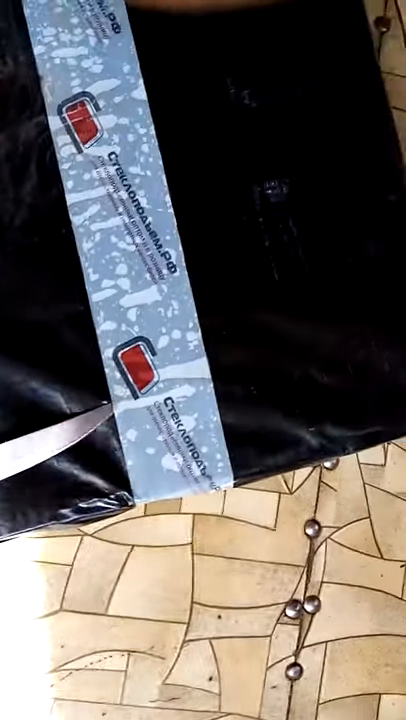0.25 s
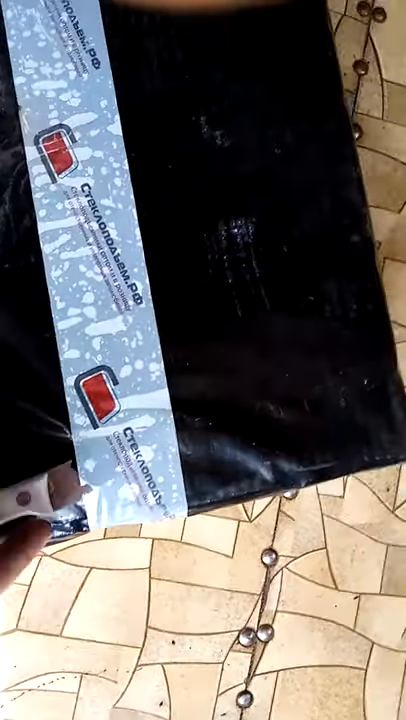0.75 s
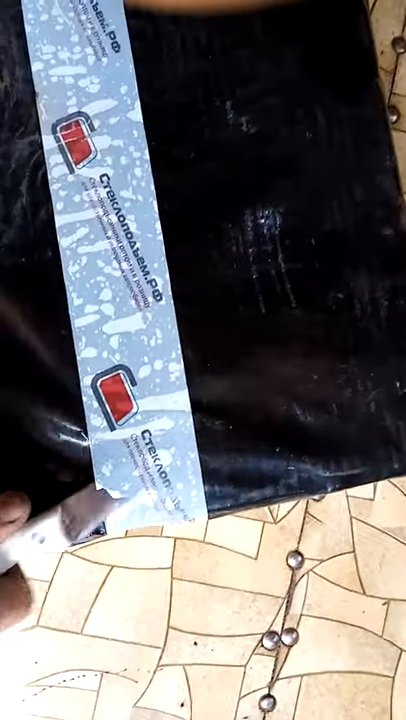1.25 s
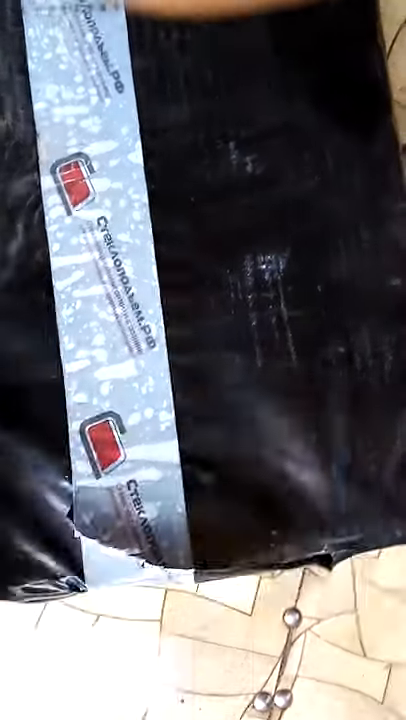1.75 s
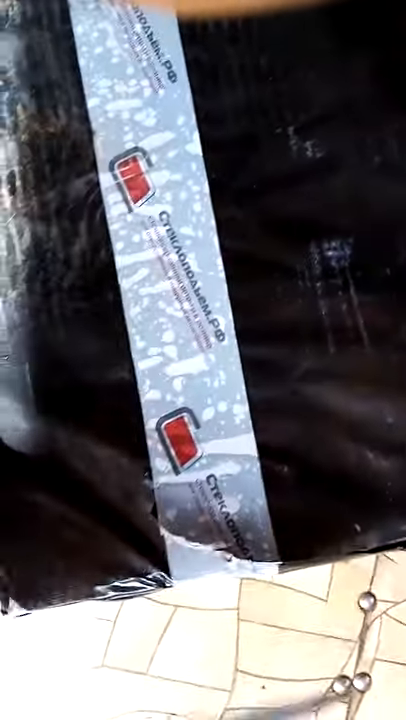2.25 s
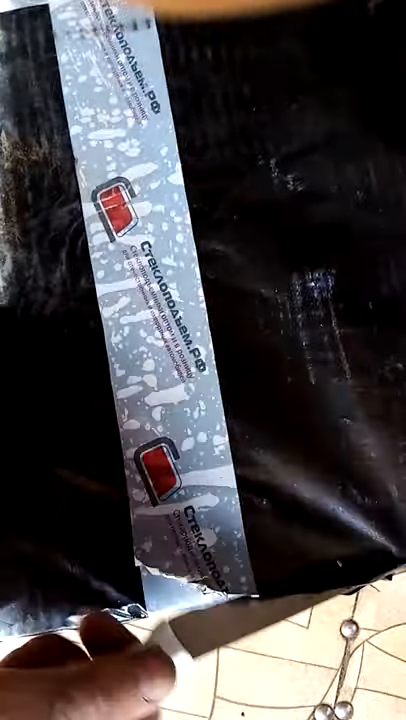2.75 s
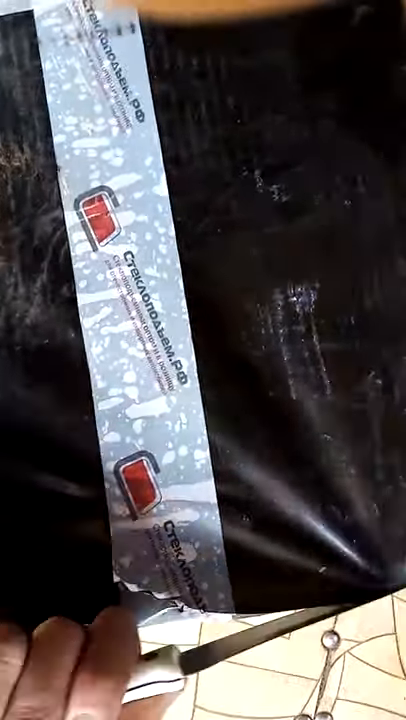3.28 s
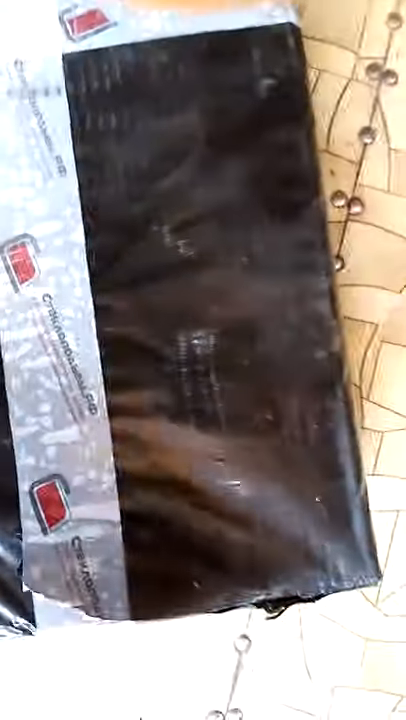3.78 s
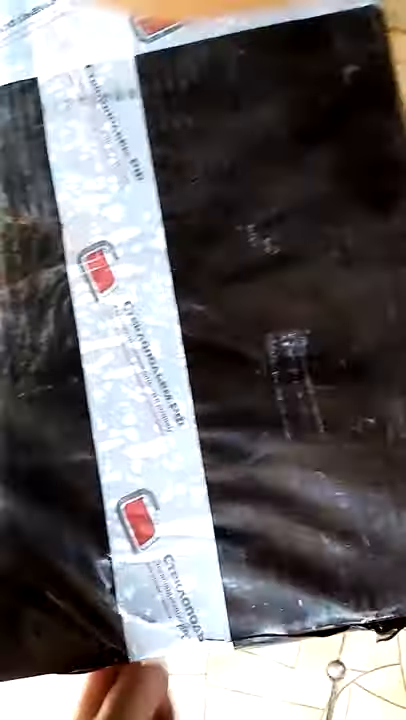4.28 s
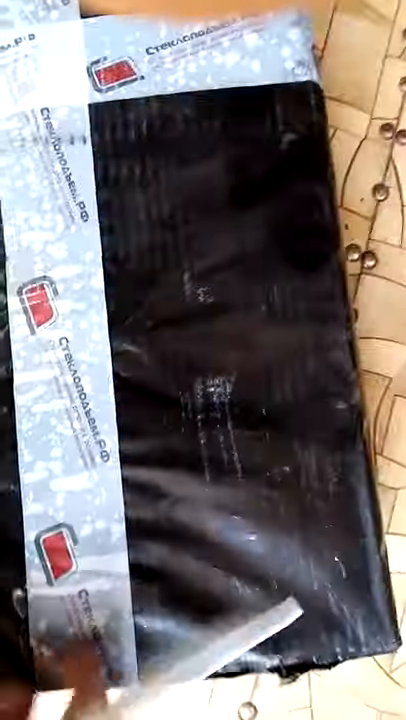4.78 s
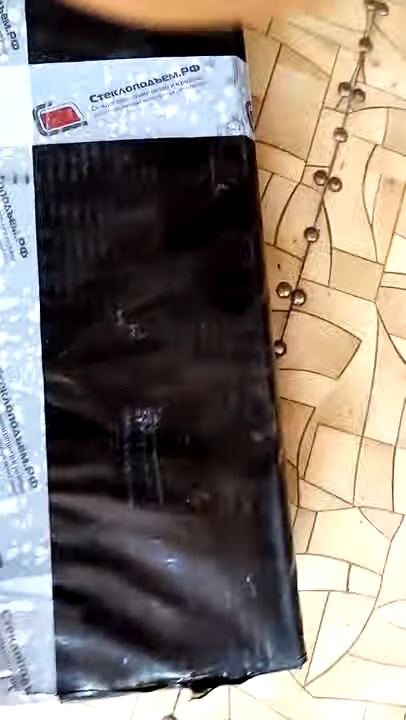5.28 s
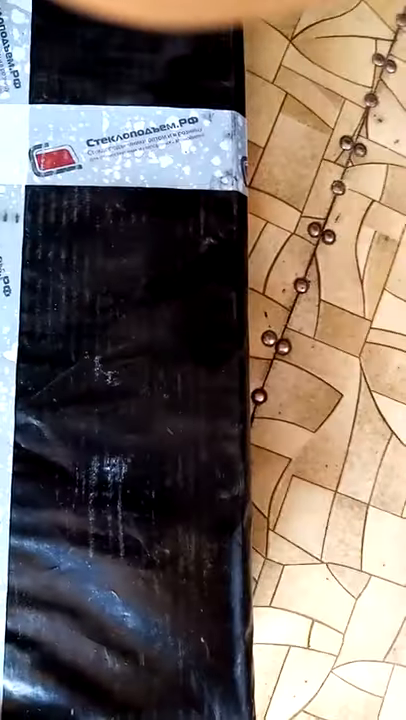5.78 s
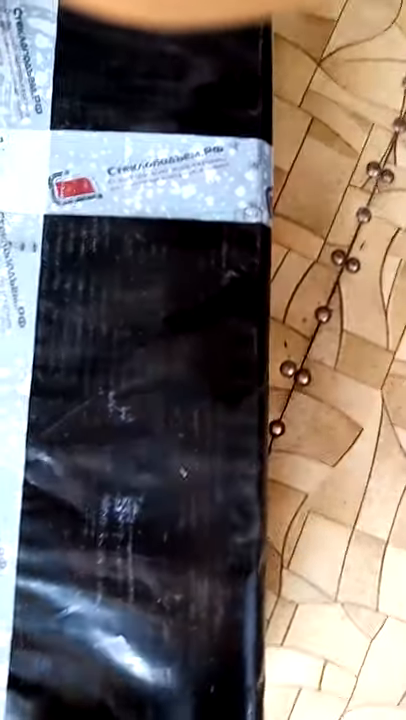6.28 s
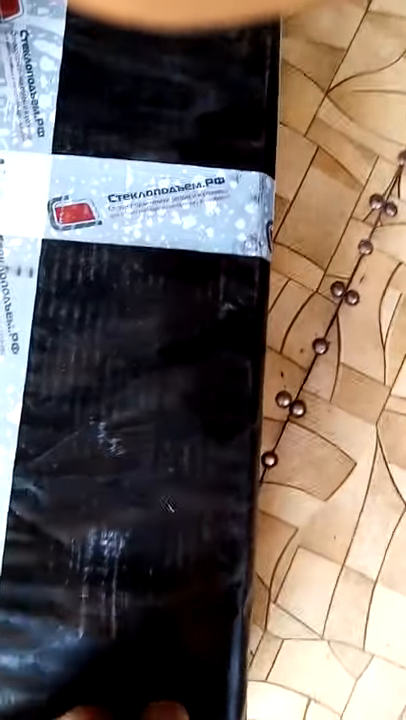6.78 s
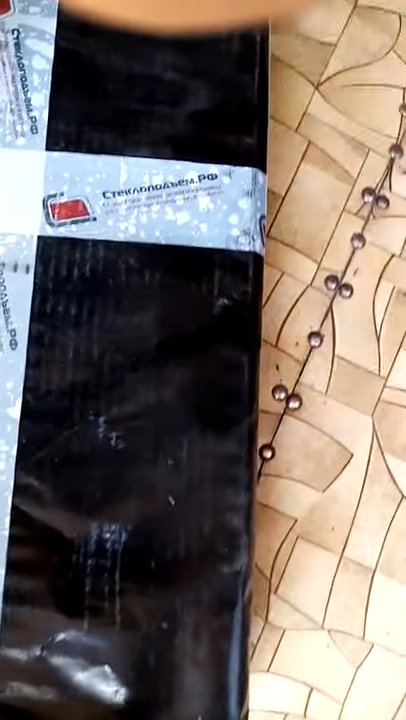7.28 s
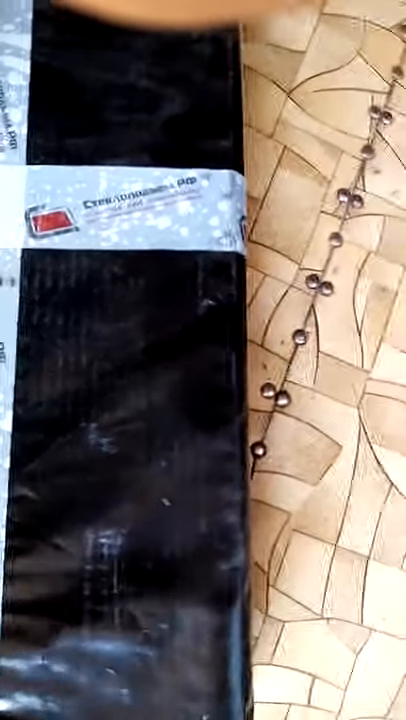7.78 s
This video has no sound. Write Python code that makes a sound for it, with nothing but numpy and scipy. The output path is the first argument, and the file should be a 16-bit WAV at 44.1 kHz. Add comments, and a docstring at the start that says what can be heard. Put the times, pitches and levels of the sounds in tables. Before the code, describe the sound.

Heard very close in a small room, left side much stronger, the right weaker and more diffuse, over faint hiss. From 0 to 1.7 s a blade works through plastic film and tape: a bright rasp at 0.25-0.55 s with a falling squeaky edge, then short scratchy strokes with clusters of sharp snaps and hollow cardboard knocks. It fades to near quiet around 1.9-2.3 s. Strong rubbing strokes return at 2.4-2.9 s, then a hard snap and knock at 3.26 s. Faint crinkles follow; at 3.85-4.15 s the parcel is handled with rustles, small snaps and a low thump. From 4.2 to 6.3 s it is sparse: soft rustles, bumps at 4.65, 5.88 and 6.15 s, with near-silent gaps. From 6.5 s loud film pulls come in a run, with a low thump at 6.6 s, a knock at 6.77 s, a brief squeak near 7.2 s, and rapid snaps up to 8 s.

```python
"""First a knife slits the plastic film and packing tape around a cardboard parcel; then hands turn it and pull the film.
After a busy opening and a lull come more strokes, a quieter, patchy stretch, and a loud run of pulls to finish.
Blade and film rub in dense tiny slips, stretched tape lets go in sharp snaps, and the box answers with hollow knocks.
All is close to a hand-held recorder in a small room; its right microphone is much weaker, most in the upper middle."""
import sys
import numpy as np
from scipy import signal
from scipy.fft import rfft, irfft, next_fast_len
from scipy.io import wavfile
from scipy.ndimage import uniform_filter1d, map_coordinates

SR = 44100
rng = np.random.default_rng(int(sys.argv[2]) if len(sys.argv) > 2 else 0)


def int16_out(signal):
    """Quantize to a 16-bit WAV file."""
    q = np.round(np.clip(np.atleast_2d(signal).T, -1, 1) * 32767)
    wavfile.write(sys.argv[1], SR, q.astype(np.int16))


N = 354563
TIME = np.arange(N) / SR


def amp(db):
    """Decibels to gain."""
    return 10 ** (np.asarray(db) / 20)


def unit(x):
    """Scales to rms 1."""
    return x / np.sqrt(np.mean(x ** 2) + 1e-20)


def read(points, hz):
    """Joins (f/Hz, value) points on a log-frequency axis."""
    f, value = np.transpose(points)
    return np.interp(np.log(hz + 1), np.log(f + 1), value)


def add(mix, start_s, sound):
    """Mixes a sound in at its start time."""
    part = mix[max(round(start_s * SR), 0):][:len(sound)]
    part += sound[:len(part)]


def coloured(x, points):
    """Filters x by a (f/Hz, gain/dB) curve."""
    size = next_fast_len(N + 4096)
    gain = amp(read(points, np.fft.rfftfreq(size, 1 / SR)))
    return irfft(rfft(x, size) * gain, size)[..., :N]


def causal(db):
    """Minimum-phase impulse response with the given gains: it starts sharply, then dies."""
    cepstrum = irfft(np.log(amp(db)))
    half = len(cepstrum) // 2
    # fold the backward half of the cepstrum onto the forward half
    cepstrum[1:half] *= 2
    cepstrum[half + 1:] = 0
    return irfft(np.exp(rfft(cepstrum)))


def wander(per_s):
    """Random curve of rms 1 that heads for a new point per_s times a second."""
    return unit(np.interp(TIME * per_s, np.arange(N), rng.standard_normal(N)))


def ripple(shape, order, size):
    """Random pattern of rms 1, smoothed over order bins and size frames."""
    noise = rng.standard_normal(shape)
    across_pitch = uniform_filter1d(noise, order, axis=0)
    return unit(uniform_filter1d(across_pitch, size, axis=1))


# colour of the still room and microphone hiss: (f/Hz, relative level per Hz/dB)
HISS_COLOUR = [(24, -53), (40, -17), (118, 3.5), (1070, -9), (1410, -5.5), (3060, -11), (4460, -12),
               (4800, -22), (6020, -23), (6820, 2.5), (7360, -6), (8550, -31), (13800, -31), (14800, -25),
               (16000, -38)]


def hiss(left_db=-66, right_db=-74):
    """Steady, independent noise in each microphone, stronger on the left."""
    noise = coloured(rng.standard_normal((2, N)), HISS_COLOUR)
    return unit(noise) * amp([[left_db], [right_db]])


def echoes(x, t60, start_s):
    """Sparse reflections of random sign, each band dying at its own speed."""
    strength = rng.standard_normal(SR)
    hits = rng.random(SR) < 4000 / SR  # about 4000 reflections per second
    taps = strength * hits * (np.arange(SR) > start_s * SR)
    hz, t, bands = signal.stft(taps, SR, nperseg=128)
    decay = amp(-60 * t / read(t60, hz)[:, None])
    tail = signal.istft(bands * decay, SR, nperseg=128)[1]
    return signal.fftconvolve(x, tail / np.linalg.norm(tail))[:N]


# how long the small room rings: (f/Hz, t60/s)
ROOM_RING = [(100, 0.33), (400, 0.44), (1500, 0.24), (5000, 0.073), (12000, 0.31)]


def room(parcel, start_s):
    """The room returns the parcel as a ring whose length depends on pitch."""
    return echoes(parcel, ROOM_RING, start_s)


# cut that weakens all the right microphone hears of the parcel, most around 2.5 kHz: (f/Hz, cut/dB)
RIGHT_SHADE = [(60, 10.5), (250, 9), (700, 13), (1500, 19), (2500, 21.5), (4000, 15.5), (6500, 15.5),
               (8500, 8.5), (12000, 7.5), (15500, 3.5)]


def right_microphone(parcel, room_db=-11, scatter_db=0, direct_db=-6):
    """Farther off and shaded, it hears the parcel later, and much of it by reflection."""
    lag_s = np.interp(TIME, [0, 8], [.00097, .00073])
    late = map_coordinates(parcel, [(TIME - lag_s) * SR], order=3)
    direct = coloured(late, [(400, 0.011), (2000, direct_db), (7000, direct_db - 8.5)])
    # the paths of the reflections change as the hands and the parcel move
    turn = np.pi * wander(per_s=4)
    near = [(200, 0.023), (6000, 0.021)]  # (f/Hz, t60/s)
    first = echoes(late, near, start_s=.0003)
    second = echoes(late, near, start_s=.0003)
    moving = np.cos(turn) * first + np.sin(turn) * second
    scattered = coloured(moving, [(150, -10.0), (700, -3), (2000, -0.5)])
    heard = direct + amp(scatter_db) * scattered + amp(room_db) * room(parcel, start_s=0.009)
    return coloured(heard, [(hz, -cut_db) for hz, cut_db in RIGHT_SHADE])


# the whole parcel shifting on the table: (t/s, level before output gain/dB, swell time/s)
PARCEL_SHIFTS = [(3.914, -34, 0.0096), (6.603, -36, 0.025)]


def thumps(low_hz=73, upper_hz=122, upper_db=-7):
    """The heavy parcel rocks on the table: two low tones swell briefly and die."""
    out, t = np.zeros(N), np.arange(SR // 2) / SR
    low = np.sin(2 * np.pi * low_hz * t)
    upper = amp(upper_db) * np.sin(2 * np.pi * upper_hz * t)
    for start, level, swell_s in PARCEL_SHIFTS:
        swell = t / swell_s * np.exp(1 - t / swell_s)  # peaks at 1
        add(out, start, amp(level) * np.sqrt(2) * (low + upper) * swell)
    return out


# blade or fingers bumping the box: (t/s, level over 30 ms before output gain/dB, hardness/dB)
BOX_BUMPS = [(0.1495, -31, -16), (0.2281, -40.5, -2), (0.5741, -42, 8), (0.8929, -40.5, 11),
             (1.4845, -39.5, 16), (1.5853, -38, 16), (1.6772, -55, 6), (2.3795, -32.5, -3.5),
             (3.2566, -33.5, -16), (3.2907, -41.5, 2), (3.9042, -39, 11.5), (4.6459, -40, -9),
             (4.7642, -46, -1), (4.9239, -39, 8), (5.5398, -45.5, -9.5), (5.5876, -49, 4),
             (5.8824, -34.5, -4), (6.1497, -35, 3), (6.35, -36.5, -19), (6.7697, -32.5, 11),
             (7.2947, -41.5, -1), (7.6088, -39, 10)]
# modes of the cardboard box: (f/Hz, relative level/dB, t60/s)
BOX_MODES = [(121, -15.5, 0.17), (159.5, -12.5, 0.091), (246.3, 0.5, 0.1), (260, -7.5, .07),
             (353, -9.5, 0.038), (600, -3.5, 0.17), (707, -8, 0.036), (850, -2, 0.075), (1079, -4.5, 0.032),
             (1250, -7, 0.036), (1420, -18.5, 0.0053), (1510, 0, 0.026)]


def knocks(place_db=3, detune=0.069, thud_db=-3, thud_t60=0.11):
    """Every bump rings the box modes over a dull thud; a hard bump rings the upper ones more."""
    out, t = np.zeros(N), np.arange(SR // 3) / SR
    hz, mode_db, t60 = np.transpose(BOX_MODES)[:, :, None]
    draws = rng.standard_normal((len(BOX_BUMPS), 3, len(BOX_MODES), 1))
    cardboard = signal.butter(2, [130, 900], "band", fs=SR, output="sos")
    thuds = signal.sosfilt(cardboard, rng.standard_normal((len(BOX_BUMPS), len(t))))
    for (start, level, hard_db), (place, shift, side), thud in zip(BOX_BUMPS, draws, thuds):
        # each bump favours other modes, flips some, and detunes the upper ones most
        hardness = hard_db * read([(300, 0.023), (600, 0.33)], hz)
        size = np.sign(side) * amp(mode_db + place_db * place + hardness)
        pitch = hz * (1 + detune * shift * hz / hz.max())
        modes = size * amp(-60 * t / t60) * np.sin(2 * np.pi * pitch * t)
        ring = modes.sum(0) + amp(thud_db) * unit(thud) * amp(-60 * t / thud_t60)
        add(out, start, amp(level) * ring / np.std(ring[:round(.03 * SR)]))
    return out


# film and box sounding one resonance as they catch on the blade or on each other:
# (t/s, length/s, start f/Hz, end f/Hz, width/Hz, level before fades and output gain/dB)
CATCHES = [(0.312, 0.26, 4646, 2103, 1060, -31.5), (1.157, 0.15, 2075, 2560, 261, -30.5),
           (1.863, 0.087, 2160, 2980, 500, -56), (2.28, 0.033, 1480, 1073, 700, -59.5),
           (2.411, 0.18, 591, 547, 131, -38.5), (2.436, 0.23, 2830, 3470, 500, -36),
           (2.767, 0.14, 3270, 3005, 497, -30.5), (3.278, 0.091, 585, 422, 110, -39.5),
           (3.299, 0.098, 3110, 2840, 300, -43), (3.529, 0.064, 2600, 2990, 244, -56.5),
           (3.614, 0.024, 1685, 1790, 504, -49), (4.325, 0.024, 168, 139, 50, -53.5),
           (4.565, .075, 4130, 4100, 50, -64), (5.236, .11, 4100, 4080, 100, -68),
           (5.378, 0.062, 4130, 4170, 90, -74), (5.47, 0.017, 6300, 5910, 1400, -42.5),
           (6.799, 0.12, 1920, 2200, 500, -33.5), (7.178, 0.03, 4070, 4330, 280, -27),
           (7.804, 0.041, 1740, 1865, 380, -28.5)]


def squeaks():
    """For a moment the slips feed one resonance, gliding as the film is stretched or let go."""
    out = np.zeros(N)
    noises = rng.standard_normal((len(CATCHES), 2, SR // 2))
    for (start, length, start_hz, end_hz, width, level), noise in zip(CATCHES, noises):
        count, pole = round(length * SR), np.exp(-np.pi * width / SR)
        # slow complex noise gives the tone its width; the carrier gives it its pitch
        sway = signal.lfilter([1], np.poly([pole, pole]), noise[0] + 1j * noise[1])[-count:]
        phase = 2 * np.pi * np.cumsum(np.linspace(start_hz, end_hz, count)) / SR
        ring = (sway * np.exp(1j * phase)).real
        add(out, start, amp(level) * unit(ring) * signal.windows.tukey(count, .7))
    return out


# broad colour of the film: (f/Hz, relative level per Hz/dB)
FILM_COLOUR = [(29, -36.5), (50, -20.5), (70, -17), (208, -4.5), (240, -2), (408, -6), (586, -1.5),
               (973, -10.5), (2270, -2), (4900, 1.5), (6550, 1.5), (9180, -23.5), (12900, -35.5),
               (14900, -36.5), (16000, -34)]
# finer peaks and dips, those near 7 and 15 kHz from the microphones: (f/Hz, width/Hz, height/dB)
FINE_DETAIL = [(119, 25, 6), (244, 17, 3.5), (414, 38, -3.5), (546, 58, -2.5), (2300, 300, 0.5),
               (4940, 520, -2), (7085, 710, 5), (8560, 700, -1), (15150, 550, 7.5)]


def film_db(hz):
    """Fixed colour of the film lying on its box, as the microphones hear it, with unit mean power over the
    given pitches."""
    colour = read(FILM_COLOUR, hz)
    for f, width, db in FINE_DETAIL:
        colour = colour + db * np.exp(-((hz - f) / width) ** 2)
    return colour - 10 * np.log10(np.mean(amp(colour) ** 2))


def posture_db(hz, boom_db, body_db, bright_db):
    """Change of colour: pressing on the box adds boom, slack film adds body, taut film is bright."""
    boom = read([(380, 0.72), (650, 0)], hz)
    body = read([(380, 0), (650, 0.77), (1600, 0.97), (2500, 0.013)], hz)
    bright = read([(1600, -0.19), (2500, -0.87), (3400, -0.3), (5800, 0.5)], hz)
    return boom_db * boom + body_db * body + bright_db * bright


# runs of snaps, some loud and some faint, where the film gives way bit by bit:
# (t/s, length/s, centre level before colour and output gain/dB, centre brightness/dB)
GIVING_WAY = [(0.574, 0.049, -26.5, -2.5), (1.174, .09, -43, -10), (1.404, .035, -23, -3),
              (3.423, .05, -51.5, 10), (3.633, .11, -52, 12.5), (4.153, .035, -36.5, 3),
              (5.808, 0.11, -43.5, 17), (7.962, 0.025, -25, -12)]


def crackle_snaps(per_s=54, body_db=-7, spread_db=3.5, colour_spread_db=4):
    """Unevenly spaced snaps of each run, as rows (t/s, level/dB, body/dB, brightness/dB)."""
    rows = []
    for start, length, level, bright in GIVING_WAY:
        count = max(round(length * per_s), 1)
        draws = rng.uniform(-1, 1, (20, 3))[:count]
        for k, (late, size, tone) in enumerate(draws):
            when = start + length * (k + .5 + .5 * late) / count
            rows.append((when, level + spread_db * size, body_db, bright + colour_spread_db * tone))
    return rows


# tape and film letting go: (t/s, level over 4 ms before colour and output gain/dB, body/dB, brightness/dB)
RELEASES = [(0.1516, -19.5, 1, -4), (0.34, -29.5, -26, 5), (0.5436, -34, -21, -4), (0.548, -27, -9, -14),
            (0.5586, -17.5, -19, -10.5), (0.6299, -25, -3, -6), (0.6437, -21, -16, -5),
            (0.6634, -22, -6, -7), (0.7585, -21.5, -7, -7.5), (1.1544, -20, -16, 4), (1.1697, -20, 7, -11),
            (1.2099, -33.5, 15, -31), (1.2614, -30.5, -3, 5), (1.2798, -22, -6, -13),
            (1.399, -22.5, -5.5, -16.5), (1.4369, -23.5, -6, -17), (1.459, -23.5, -25, -12),
            (1.4852, -17, 0, -8), (1.4878, -23, 11, -9), (1.4934, -23, -11, -12), (1.5222, -20.5, 1, -10),
            (1.5953, -24, 0, 5), (1.6792, -16.5, 7, -6), (1.924, -44.5, -12, 3),
            (1.9894, -51.5, -28.5, 35.5), (2.3784, -26.5, 5.5, -12), (2.7864, -19, 1, -3),
            (3.2576, -12.5, -51, -2.5), (3.266, -21.5, -11, -4), (3.2904, -15, -15, 2),
            (3.2932, -16, -4.5, 5), (3.63, -40, -8, -2.5), (3.8563, -33, -9, -4.5), (3.8699, -29.5, -5, 2),
            (3.8867, -34, 7, 10), (3.8956, -30, 6, 12), (3.9042, -22.5, 12, -1.5), (3.9233, -29.5, 11, 3),
            (3.964, -29.5, -27, 1), (4.0132, -30.5, -8, 5), (4.021, -39, -11, 25), (4.128, -23.5, 6, -3.5),
            (4.1325, -30, 6, -3), (4.3159, -42, -18, 9.5), (4.4851, -49, -21, 16.5),
            (4.6463, -23.5, 13, 5.5), (4.7658, -39, 14, -15), (5.1062, -54.5, -18.5, 28.5),
            (5.477, -58.5, -19, 19.5), (5.5413, -30.5, -4.5, -3), (5.591, -35.5, 13.5, -4),
            (5.709, -45.5, -22, 39), (5.863, -32, -2.5, 15.5), (6.1487, -34, 20.5, -10),
            (6.3469, -28.5, 0, 2), (6.377, -23.5, 1.5, 11), (6.5574, -19, -5, -2.5),
            (6.7384, -22.5, -41, -12), (7.198, -27, -3, 5), (7.5379, -29.5, 14, -10.5),
            (7.5845, -19.5, -9, -5), (7.6198, -21, 3.5, -4), (7.7626, -30.5, -4, -12), (7.855, -19, -33, 2),
            (7.973, -19.5, -12, -2), (7.9931, -22, -9, 2), (8.0158, -17.5, 1.5, -9)]


def snaps(flutter_db=-6, flutter_s=.0009, thin_db=-6, top_db=3):
    """Each snap is one sharp release and about a millisecond of flutter in the film."""
    out, t = np.zeros(N), np.arange(2048) / SR
    hz, span = np.fft.rfftfreq(len(t), 1 / SR), .004 * SR
    colour = film_db(hz) + top_db * read([(7500, 0), (10000, 0.93)], hz)
    rows = RELEASES + crackle_snaps()
    noises = rng.standard_normal((len(rows), len(t)))
    for (start, level, body, bright), noise in zip(rows, noises):
        release = amp(flutter_db) * noise * np.exp(-t / flutter_s)
        release[0] += 1
        boom = min(body, 0) + thin_db
        film = causal(colour + posture_db(hz, boom, body, bright))
        snap = signal.fftconvolve(release, film)
        # the film's colour, not the chance flutter, sets the energy
        energy = np.sqrt(span) * np.linalg.norm(film) / np.linalg.norm(snap)
        add(out, start, snap * amp(level) * energy)
    return out


# pushes of the blade and pulls of the hand: (t/s, length/s, level before colour and output gain/dB,
# boom of the box/dB, body of the loose film/dB, brightness/dB, top-octave fizz/dB)
PUSHES_AND_PULLS = [(0, 0.025, -51.5, 30, 7.5, 9, 2), (0.077, 0.059, -38.5, 4, 2, 1.5, 1.5),
                    (0.233, .31, -28, -6, -3.5, 4, 3), (0.553, 0.096, -34.5, 3.5, 6.5, -2.5, -3),
                    (0.663, 0.083, -32.5, 19, 12.5, 0, -7), (0.768, 0.031, -36.5, 21.5, 9.5, -5.5, 0),
                    (0.834, 0.042, -38.5, 14, -4, -4.5, 2), (0.928, 0.035, -38, 10, 13.5, 1, 2.5),
                    (1.009, 0.013, -43, 22, 23, -11, -4), (1.041, 0.059, -30, -3.5, 6, -6, 4),
                    (1.117, 0.099, -28, 2, 8, -8, 6.5), (1.202, 0.17, -33, 3, -0.5, -4.5, 1),
                    (1.392, 0.034, -35.5, 4.5, -3, -5.5, 2), (1.415, .13, -32.5, 12, 2.5, -5.5, 6),
                    (1.573, 0.063, -29, 0.5, -3.5, -3, 11), (1.633, 0.14, -44.5, 10, 4, 1, -7),
                    (1.845, .088, -50.5, -3.5, -0.5, -.5, -5), (1.983, 0.06, -59, 6, -10.5, 8.5, 2),
                    (2.094, 0.17, -69, 2, 3.5, 9.5, 0), (2.374, .12, -29, 3, 3, -4, 2.5),
                    (2.463, 0.13, -25, -1.5, 1, -0.5, 2), (2.664, 0.12, -34.5, 0, 3.5, -3.5, 12),
                    (2.734, 0.18, -28, -3, 0.5, -2, -0.5), (2.881, 0.12, -40, -4, -1.5, -3, 4),
                    (3.074, .04, -49.5, 27.5, -2, -6.5, -6), (3.126, 0.096, -48, 21, 2, -2, 1),
                    (3.244, 0.12, -34, 9.5, 2.5, 2.5, -2), (3.416, 0.062, -52.5, 16, -1, 1.5, -1),
                    (3.532, 0.21, -53, 1, -5, 0, 1), (3.838, 0.099, -40.5, 5.5, -2, -2.5, 6.5),
                    (3.959, 0.16, -41, 8.5, 3.5, 3.5, 7.5), (4.095, 0.089, -41, 8, 5.5, 0.5, 16.5),
                    (4.299, 0.019, -55.5, 2.5, 1.5, -3, 3), (4.436, 0.19, -65.5, -2.5, -5.5, 12, 3),
                    (4.692, 0.067, -40.5, 12.5, 2, 8, -4), (4.775, 0.021, -49, 14, 5, 1, -7),
                    (4.81, 0.11, -53, 6, -2.5, 7, 0), (4.883, 0.041, -36.5, -5, 11, 4.5, 4.5),
                    (4.978, 0.032, -38.5, 11, -1, 6, 0.5), (5.068, 0.32, -74, -4, 1.5, 12, -1),
                    (5.513, 0.098, -57, 2.5, 11.5, 1.5, -9), (5.7, 0.084, -65, -1.5, -3.5, 19.5, -4),
                    (5.762, 0.16, -38, 14.5, 8, -2, -0.5), (5.957, 0.073, -48.5, 29.5, 12.5, -5, -6),
                    (6.066, 0.093, -37, -2.5, 6, 7, 4), (6.253, 0.14, -38.5, 10, 5, -0.5, 0),
                    (6.507, 0.21, -23, -1, 0, 0, -1), (6.706, .18, -28.5, 1, 10.5, -4, -4.5),
                    (6.925, .15, -43, 7, 4.5, -8, 3), (7.076, 0.12, -23, -5.5, 1, -7, -1),
                    (7.2, 0.098, -36.5, 3, 1.5, -5, -7), (7.314, .17, -32.5, 1.5, 8, -3.5, -3.5),
                    (7.543, 0.054, -27.5, -1, 7, -5, -11), (7.634, 0.058, -30, -1.5, 2, -2.5, -6),
                    (7.695, .07, -43, 11, 16, -6, 0), (7.798, 0.026, -26.5, 2.5, 5, 3.5, -6),
                    (7.87, 0.032, -34.5, 8.5, 1, -1, -5), (7.918, 0.043, -28, 3.5, -1, 0, 0),
                    (7.994, 0.063, -43, 11, 22, -1, 5)]
# how fast the sound dies once the stroke stops: (f/Hz, decay in dB/s)
STROKE_DECAY = [(200, 231), (1000, 272), (2800, 278.5), (6000, 322)]


def stroke_gain(hz, t, attack_s=0.11, attack_share=0.52):
    """Gain over pitch and time: every stroke swells, holds and dies away, its treble fastest."""
    power, hz = np.zeros((len(hz), len(t))), hz[:, None]
    for start, length, level, boom, body, bright, fizz in PUSHES_AND_PULLS:
        now = (t > start) & (t < start + length + .5)
        age = t[now] - start
        # a short stroke gathers speed over a share of its length
        rise_s = min(attack_s, attack_share * length)
        swell = np.sin(np.pi / 2 * np.minimum(age / rise_s, 1)) ** 2
        fade_db = read(STROKE_DECAY, hz) * np.maximum(age - length, 0)
        # taut film and peeling tape fizz in the top octave
        fizz_db = fizz * read([(7500, 0.1), (11000, 1)], hz)
        colour_db = posture_db(hz, boom, body, bright) + fizz_db
        power[:, now] += (swell * amp(level + colour_db - fade_db)) ** 2
    return np.sqrt(power)


def slips(per_s, spread_db):
    """A random train of tiny slips of either sign, their sizes scattered exponentially in dB."""
    size = amp(spread_db * np.minimum(rng.exponential(1, N), 4))
    sign = rng.choice([-1., 1.], N)
    return unit(sign * size * (rng.random(N) < per_s / SR))


def rubbing(chatter_db=2.26, crinkle_db=-13, patchy_db=3.0, facet_db=2.5, unsteady_db=1.0):
    """Dense slips and sparse crinkles sound the film, whose resonances shift as it bends."""
    dense = slips(per_s=9000, spread_db=2.5)
    dense = dense * amp(chatter_db * wander(per_s=400) + unsteady_db * wander(per_s=50))
    drive = unit(dense + amp(crinkle_db) * slips(per_s=230, spread_db=-1.0))
    fine = np.geomspace(20, SR / 2, 600)
    film = coloured(drive, np.c_[fine, film_db(fine)])
    hz, t, bands = signal.stft(film, SR, nperseg=512, noverlap=384)
    # broad patches come and go quickly, narrow resonances of single folds last longer
    patches = patchy_db * ripple(bands.shape, order=8, size=6)
    folds = facet_db * ripple(bands.shape, order=2, size=40)
    shifting = amp(patches + folds)
    # hold their mean power steady across the main band
    main_band = (hz > 1500) & (hz < 7500)
    shifting /= np.sqrt(np.mean(shifting[main_band] ** 2, axis=0))
    rubbed = bands * shifting * stroke_gain(hz, t)
    return signal.istft(rubbed, SR, nperseg=512, noverlap=384)[1][:N]


def scene(room_db=-18, table_db=-15, output_db=6.0):
    """Parcel, near surfaces and room, as they reach the two microphones."""
    parcel = rubbing() + snaps() + knocks() + thumps() + squeaks()
    table = echoes(parcel, [(200, 0.15), (6000, 0.038)], start_s=.002)
    left = parcel + amp(table_db) * table + amp(room_db) * room(parcel, start_s=0.013)
    right = right_microphone(parcel)
    return amp(output_db) * np.array([left, right]) + hiss()


def record(dry, low_cut_hz=52, edge_hz=16100):
    """The recorder drops the deepest bass, clips peaks at full scale, then limits the band."""
    low_cut = signal.butter(3, low_cut_hz, "high", fs=SR, output="sos")
    limited = np.clip(signal.sosfilt(low_cut, dry), -1, 1)
    band_limit = signal.firwin(255, edge_hz, window=("kaiser", 9), fs=SR)
    return signal.oaconvolve(limited, band_limit[None], "same")


dry = scene()
out = record(dry)
int16_out(out)
```